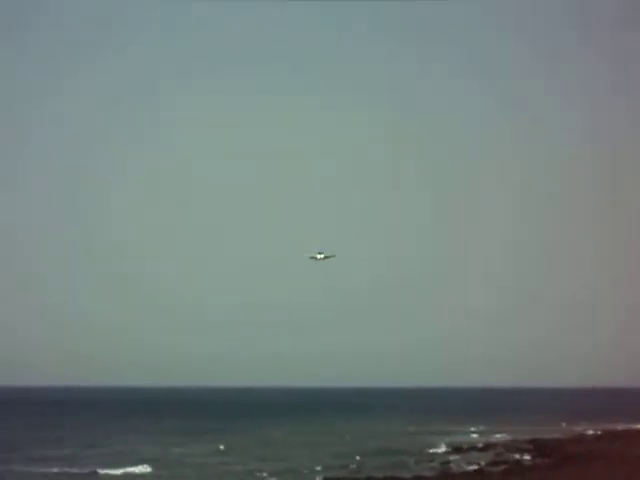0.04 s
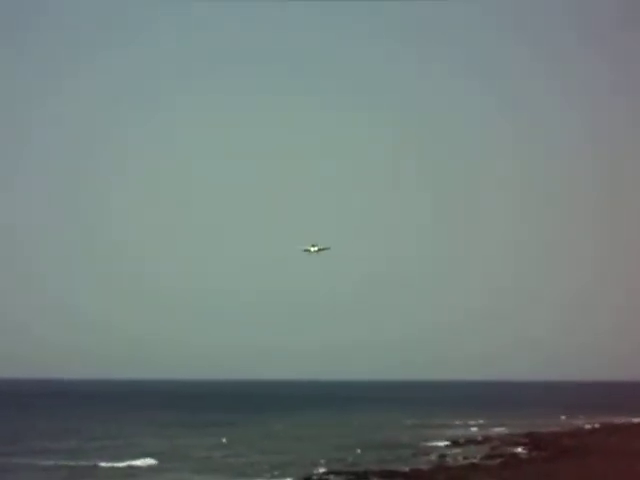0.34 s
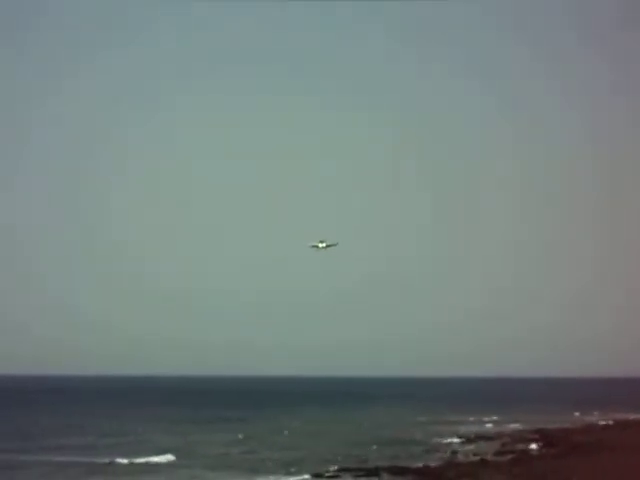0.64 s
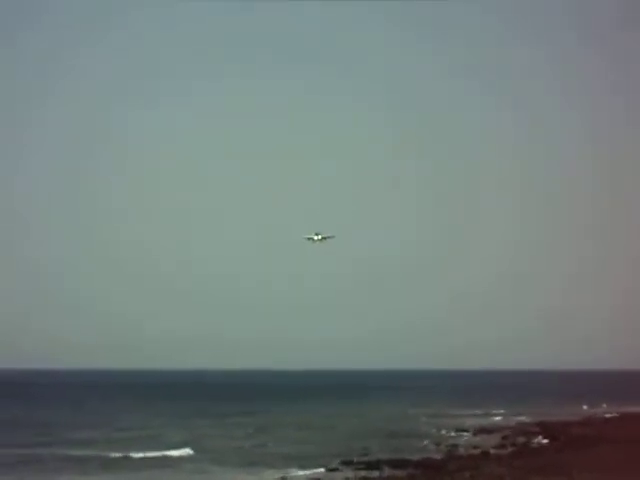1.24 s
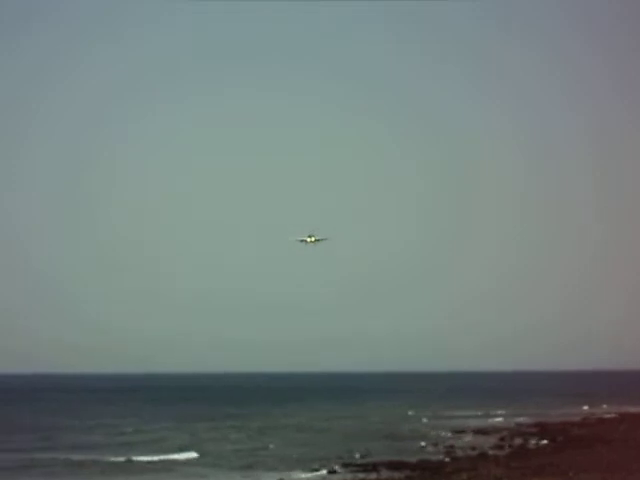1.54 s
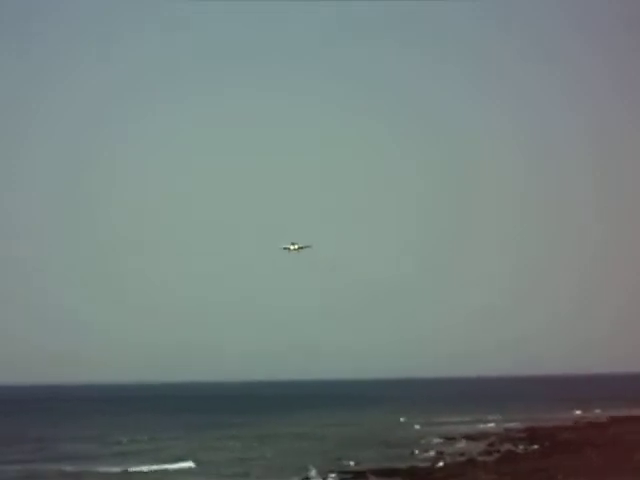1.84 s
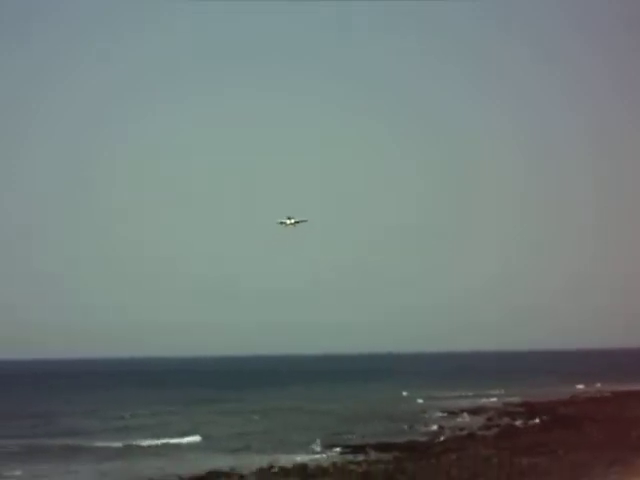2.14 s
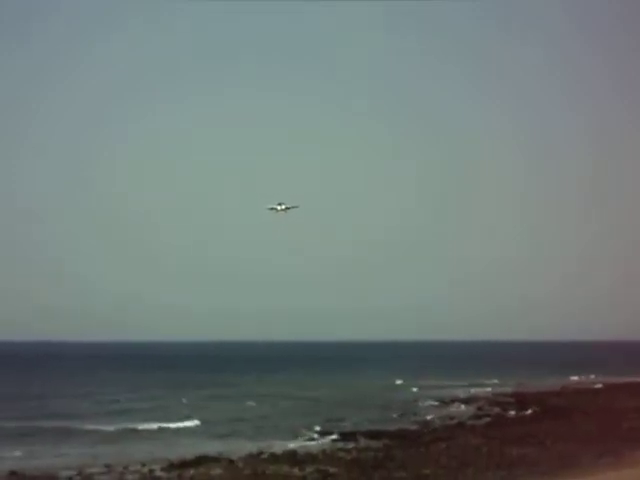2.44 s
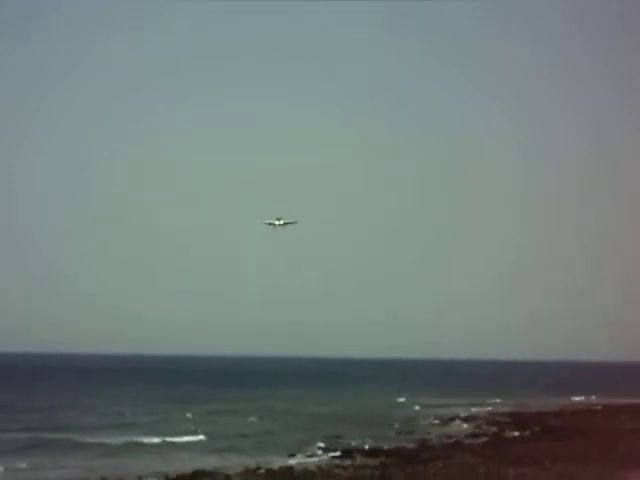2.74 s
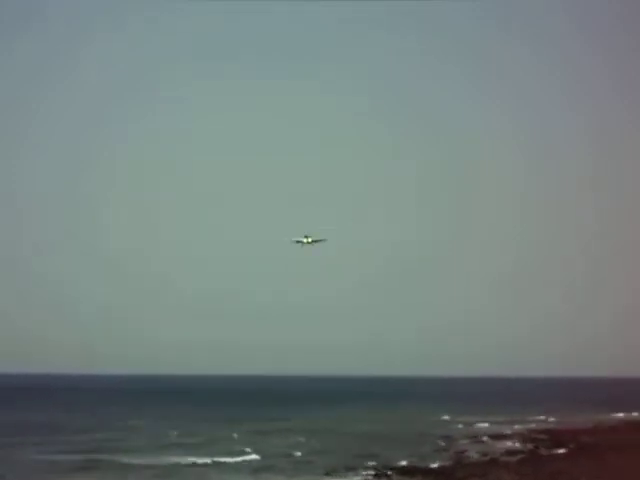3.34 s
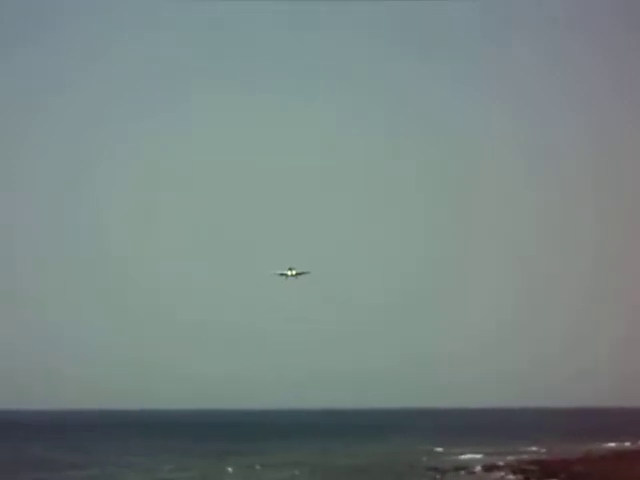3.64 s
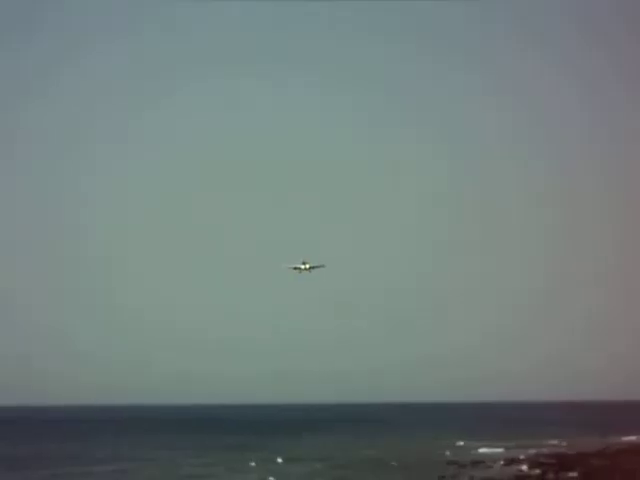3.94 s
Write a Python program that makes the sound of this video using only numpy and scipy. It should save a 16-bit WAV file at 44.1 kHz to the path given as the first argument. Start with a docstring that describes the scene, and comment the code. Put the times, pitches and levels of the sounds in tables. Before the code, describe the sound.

Gusty wind buffets the microphone for all four seconds, a deep, fluttering rumble with irregular thumps and rasps, over faint distant surf. It crackles in the strong gusts around 0.8 to 1.1 seconds and slaps hard near 2.15. Light handling ticks come at 0.75 and from 3.3 to 3.5 seconds, a sharp click at 1.4, and a faint, very brief whistle just before the end.

```python
"""Gusty shore wind beats on the small microphone of a hand-held camera. From the start, eddies press on
the diaphragm: a deep rumble, a fluttering buffet and, in strong gusts, a tearing rasp; far surf hisses in
the lulls. Large eddies soon slap the diaphragm, and it cracks when overdriven. The camera body ticks in
the hand near 0.75 s, a sharp digital click comes at 1.4 s, and the body ticks again from 3.3 s.
A faint whistle swells and fades just before the end, at 4 s."""
import sys
import numpy as np
from scipy import signal
from scipy.fft import rfft, irfft
from scipy.io import wavfile
from scipy.ndimage import uniform_filter1d

SR = 44100
rng = np.random.default_rng(int(sys.argv[2]) if len(sys.argv) > 2 else 0)


def digitize_waveform(pressure):
    """Quantize a signal to 16-bit integers and store it at the path in sys.argv[1].

    Rows of a 2-D input are taken as channels; values are limited to [-1, 1].
    """
    field = np.atleast_2d(pressure).T
    bounded = np.clip(field, -1, 1)
    quanta = np.round(bounded * 32767).astype(np.int16)
    wavfile.write(sys.argv[1], SR, quanta)


N = 176400

# strength of the gusts, as the relative level of their rasp: t/s, level/dB
GUST_LEVELS = [(0.0, -45), (0.05, -34), (0.08, -42.5), (0.22, -27.5), (0.259, -34), (0.279, -36.5),
               (0.359, -46.5), (0.419, -46.5), (0.449, -28), (0.659, -38), (0.678, -27), (0.718, -46),
               (0.738, -26), (0.788, -35.5), (0.818, -22.5), (0.838, -33.5), (0.878, -26.5), (0.908, -52),
               (0.928, -30.5), (1.018, -27.5), (1.038, -35.5), (1.058, -27), (1.187, -44), (1.207, -31.5),
               (1.327, -36), (1.367, -41), (1.497, -32), (1.616, -33), (1.636, -27), (1.666, -36),
               (1.696, -29.5), (1.766, -43), (1.786, -35.5), (1.906, -48), (1.926, -32), (1.976, -42.5),
               (2.045, -36), (2.125, -43.5), (2.155, -31.5), (2.205, -47.5), (2.295, -53.5), (2.345, -35),
               (2.424, -48), (2.494, -42.5), (2.554, -36.5), (2.614, -37.5), (2.704, -30), (2.724, -33),
               (2.844, -34), (2.863, -39), (2.993, -38), (3.013, -36.5), (3.113, -42), (3.223, -40),
               (3.273, -35), (3.352, -41), (3.422, -31.5), (3.512, -44.5), (3.572, -33), (3.622, -34.5),
               (3.642, -30.5), (3.722, -41.5), (3.751, -35), (3.801, -45), (3.841, -35), (3.911, -45),
               (3.971, -38.5), (3.996, -46.5)]
# relative spectral density of the wind pressure on the diaphragm: f/Hz, level/dB
WIND_SPECTRUM = [(12, -18.5), (25, -1.5), (55, -1), (85, 0.5), (150, -2), (205, -5.5), (260, -6),
                 (400, -10), (810, -15), (970, -20.5), (1550, -22.5), (2600, -32), (4000, -35),
                 (5000, -41.5), (5800, -50)]
DIAPHRAGM_HZ, DIAPHRAGM_T60_S = 2610, 0.0013   # the mode that rings under overload


def from_db(db):
    """Amplitude ratio of a level: tenfold for every 20 dB."""
    return 10 ** (np.asarray(db) / 20)


def unit_rms(x):
    """Normalisation to unit mean power."""
    return x / np.sqrt(np.mean(x ** 2) + 1e-20)


def in_time(rows):
    """Linear interpolation of (time, value) rows at every sample."""
    return np.interp(np.arange(N) / SR, *np.transpose(rows))


def drift(hz):
    """Slow random fluctuation of unit spread: noise through two low-pass poles at hz."""
    step, settle = 20, 2000   # samples per coarse step; steps for the filter to settle
    pole = np.exp(-2 * np.pi * hz * step / SR)
    noise = rng.standard_normal(N // step + settle + 2)
    slow = signal.lfilter([1], [1, -2 * pole, pole * pole], noise)[settle:]
    return np.interp(np.arange(N) / step, np.arange(len(slow)), unit_rms(slow))


def log_bins():
    """Log frequency of each bin of a Fourier transform of length 2N."""
    return np.log(np.maximum(np.arange(N + 1) * SR / (2 * N), 1))


def coloured(x, spectrum):
    """Minimum-phase filtering: folding the cepstrum onto positive time makes the response causal."""
    hz, db = np.transpose(spectrum)
    gain = from_db(np.interp(log_bins(), np.log(hz), db))
    cepstrum = irfft(np.log(gain))
    cepstrum[1:N] *= 2
    cepstrum[N + 1:] = 0
    return irfft(rfft(x, 2 * N) * np.exp(rfft(cepstrum)))[:N]


def ring(x, hz, t60):
    """Damped resonance: one mode, driven by x, whose free vibration falls 60 dB in t60 seconds."""
    radius, angle = from_db(-60 / (t60 * SR)), 2 * np.pi * hz / SR
    return signal.lfilter([0, np.sin(angle)], [1, -2 * radius * np.cos(angle), radius ** 2], x + 1e-18)


def decay(tau_s):
    """Exponential decay with time constant tau_s."""
    return np.exp(-np.arange(N) / SR / tau_s)


def play(events, shape):
    """Superposition: convolution places one shape at each event's time and peak level."""
    impulses = np.zeros(N)
    for at_s, db in events:
        impulses[int(at_s * SR)] += from_db(db)
    return signal.fftconvolve(impulses, shape / np.abs(shape).max())[:N]


def eddies(per_s=1100, spread_db=2, even_flow_db=-1.5):
    """Shot noise: random pressure kicks of uneven size ride on the Gaussian noise of an even flow."""
    sizes = from_db(spread_db * np.minimum(rng.exponential(1, N), 4)) * rng.choice([-1, 1], N)
    kicks = sizes * (rng.random(N) < per_s / SR)
    flow = unit_rms(kicks) + from_db(even_flow_db) * rng.standard_normal(N)
    return coloured(flow, WIND_SPECTRUM)


def wind(rms_db=-26, flutter_hz=52.5, even_out_s=0.066, own_flutter_db=1.38):
    """Turbulent pressure on the diaphragm: the unsteady flow modulates each band's amplitude."""
    # relative level of the deepest rumble: t/s, level/dB
    rumble = [(0.0, -30), (0.06, -44.5), (0.16, -34.5), (0.259, -24.5), (0.319, -38), (0.728, -34),
              (0.788, -23), (0.908, -35), (0.958, -19.5), (1.197, -32), (1.347, -30.5), (1.397, -26.5),
              (1.596, -31.5), (1.836, -40.5), (2.175, -30.5), (2.255, -44.5), (2.624, -29.5), (2.814, -26),
              (2.943, -50.5), (3.093, -35), (3.163, -40.5), (3.372, -28), (3.562, -32.5), (3.851, -27),
              (3.901, -31), (3.996, -34.5)]
    # relative level of the buffeting in the bass: t/s, level/dB
    buffet = [(0.0, -37), (0.06, -21.5), (0.2, -26), (0.359, -31), (0.569, -26.5), (0.599, -27),
              (0.688, -28.5), (0.758, -25.5), (0.808, -22.5), (0.908, -23.5), (0.968, -22), (1.018, -26),
              (1.058, -18.5), (1.167, -30.5), (1.227, -26), (1.417, -24.5), (1.636, -24), (1.876, -28.5),
              (1.946, -23.5), (2.095, -37), (2.165, -19.5), (2.245, -42), (2.305, -33), (2.375, -19.5),
              (2.424, -36), (2.474, -21.5), (2.824, -22), (2.963, -28), (3.013, -23.5), (3.173, -31.5),
              (3.382, -25), (3.532, -29), (3.582, -23), (3.851, -29), (3.901, -37.5), (3.996, -21.5)]
    # extra swing of the treble: t/s, level/dB
    treble = [(0, 6.5), (.28, 0.5), (.42, 0.5), (.62, -8), (.8, 1.5), (1.1, 2.5), (1.3, -1), (1.6, 2),
              (1.9, -1), (2.4, -1.5), (2.55, 2.5), (2.85, 6.5), (3.15, 1.5), (3.6, 0.5), (4, -5)]
    # bands: centre f/Hz, weights of rumble, buffet, gusts and treble, depth of common flutter/dB
    bands = [(32, 0.66, 0, 0, 0.065, 0.7), (76.4, 0.64, 0.56, 0.016, 0.3, .8),
             (153, 0.084, 1.05, .05, 0.061, 1.8), (325, 0, 0.62, 0.47, 0.038, 1.8),
             (650, 0, .25, .63, 0, 1.3), (1400, 0.058, 0.013, 0.88, .15, 2.0),
             (3420, 0.12, 0.14, 1.18, 1, 3)]
    pressure_spectrum = rfft(unit_rms(eddies()), 2 * N)
    flutter = drift(flutter_hz)
    flutter = unit_rms(flutter - uniform_filter1d(flutter, int(even_out_s * SR)))
    controls = np.array([in_time(rumble), in_time(buffet), in_time(GUST_LEVELS), in_time(treble), flutter])
    log_centres = np.log([row[0] for row in bands])
    pressure = np.zeros(N)
    for selector, (_, *weights) in zip(np.eye(len(bands)), bands):
        passband = np.interp(log_bins(), log_centres, selector)   # crossfades into its neighbours
        band = irfft(pressure_spectrum * passband)[:N]
        swing_db = np.dot(weights, controls) + own_flutter_db * drift(flutter_hz)
        pressure += band * unit_rms(from_db(swing_db))
    return from_db(rms_db) * unit_rms(pressure)


def surf(rms_db=-51.5):
    """Incoherent addition: distant breakers merge into a steady noise, which the gusts mask."""
    # relative spectral density of far surf: f/Hz, level/dB
    surf_spectrum = [(30, 0), (300, 1.5), (750, -7.5), (1000, -13.5), (1600, -13), (2600, -16), (4200, -18),
                     (5100, -16), (5900, -27.5)]
    return from_db(rms_db) * unit_rms(coloured(rng.standard_normal(N), surf_spectrum))


def crackle(per_s=73, rate_exponent=1.2, offset_db=-2.5, spread_db=7):
    """Overload as a Poisson process: the diaphragm snaps more often and harder as the gust grows."""
    gust_db = in_time(GUST_LEVELS)
    rate = per_s * unit_rms(from_db(rate_exponent * gust_db))
    snaps = rng.random(N) < rate / SR
    sizes = from_db(gust_db + offset_db + spread_db * np.clip(rng.standard_normal(N), -2, 2))
    return ring(snaps * sizes * rng.choice([-1, 1], N), DIAPHRAGM_HZ, DIAPHRAGM_T60_S)


def slaps(rasp_db=-12, rasp_tau_s=0.0055, rasp_above_hz=350):
    """Pressure impulses: single large eddies thump the diaphragm and break up in a short rasp."""
    # sudden slaps of air: t/s, peak level/dB
    impacts = [(.148, -19.5), (.183, -13), (.272, -22), (.434, -25), (.674, -20.5), (.868, -20),
               (.926, -23.5), (1.052, -23), (1.099, -16), (1.382, -20.5), (1.522, -22.5), (1.926, -21.5),
               (2.040, -23), (2.094, -22), (2.149, -11.5), (2.167, -19.5), (2.346, -18.5), (2.381, -24.5),
               (2.479, -24.5), (2.649, -16.5), (3.267, -17.5), (3.640, -18), (3.837, -21)]
    thumps = play(impacts, coloured(signal.unit_impulse(N), WIND_SPECTRUM))
    high_pass = signal.butter(2, rasp_above_hz, "high", fs=SR, output="sos")
    breakup = unit_rms(signal.sosfilt(high_pass, eddies()))
    rasps = from_db(rasp_db) * breakup * play(impacts, decay(rasp_tau_s))
    return rasps - thumps


def cracks():
    """Impulse response: overdriven at the top of a gust, the diaphragm rings very briefly."""
    # hard cracks of the diaphragm: t/s, peak level/dB
    overloads = [(.184, -27), (.455, -24), (.820, -15), (.931, -22.5), (.984, -16), (1.017, -19),
                 (1.058, -20), (1.100, -26), (1.211, -21), (1.524, -16), (1.637, -24), (2.1533, -12),
                 (2.171, -21), (2.347, -22)]
    return play(overloads, ring(signal.unit_impulse(N), DIAPHRAGM_HZ, DIAPHRAGM_T60_S))


def handling(rub_tau_s=0.0014, rub_db=-8):
    """Friction: brief rubs of the hand excite the well-damped modes of the plastic body."""
    # ticks of the hand on the body: t/s, relative level/dB
    ticks = [(.753, -23), (.771, -20.5), (3.297, -33.5), (3.306, -36), (3.3328, -20.5), (3.3727, -22),
             (3.5289, -28.5)]
    # modes of the body: f/Hz, relative level/dB, T60/s
    modes = [(3300, 0, .006), (4100, -6, .006)]
    body = np.zeros(N)
    for hz, db, t60 in modes:
        resonance = ring(rng.standard_normal(N), hz, t60)
        body += from_db(db) * unit_rms(ring(resonance, hz, t60 / 2))   # a second pass steepens the skirts
    return from_db(rub_db) * unit_rms(body) * play(ticks, decay(rub_tau_s))


def digital_click(at_s=1.4233, peak_db=-21.5, corner_hz=500):
    """A discontinuity is broadband, a thin, bright click: the signal steps once and dies away."""
    return play([(at_s, peak_db)], decay(1 / (2 * np.pi * corner_hz)))


def whistle(at_s=3.970, sigma_s=0.023, hz=1445, peak_db=-41, waver=0.0172):
    """Random frequency modulation: a thin tone wavers as it swells and fades in a Gaussian envelope."""
    swell = np.exp(-.5 * ((np.arange(N) / SR - at_s) / sigma_s) ** 2)
    pitch_hz = hz * (1 + waver * drift(hz=60))
    return from_db(peak_db) * swell * np.sin(2 * np.pi * np.cumsum(pitch_hz) / SR)


def scene():
    """Superposition: the sounds add at the one microphone."""
    return (wind() + surf() + crackle() + slaps() + cracks() + handling() + whistle())[None]


def record(dry, roll_off_hz=4940, bandwidth_hz=5949, cutoff_hz=16000):
    """Band limiting: narrow low-pass filters dull the sound; the click enters after them, still bright."""
    dull = signal.sosfilt(signal.butter(8, roll_off_hz, fs=SR, output="sos"), dry)
    narrow = signal.sosfilt(signal.ellip(10, .1, 80, bandwidth_hz, fs=SR, output="sos"), dull)
    output_filter = signal.ellip(10, .1, 80, cutoff_hz, fs=SR, output="sos")
    return signal.sosfilt(output_filter, narrow + digital_click())


dry = scene()
out = record(dry)
digitize_waveform(out)
```